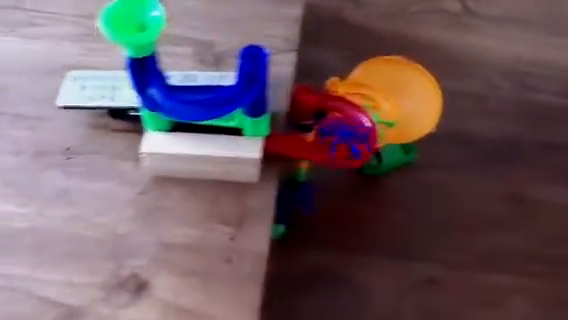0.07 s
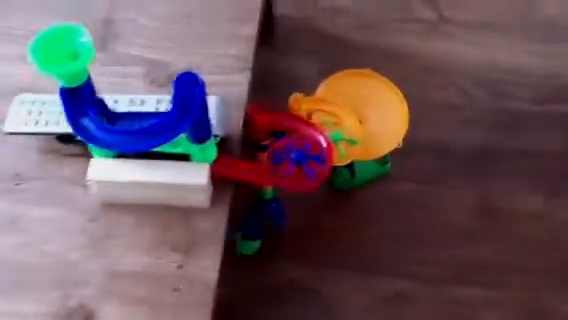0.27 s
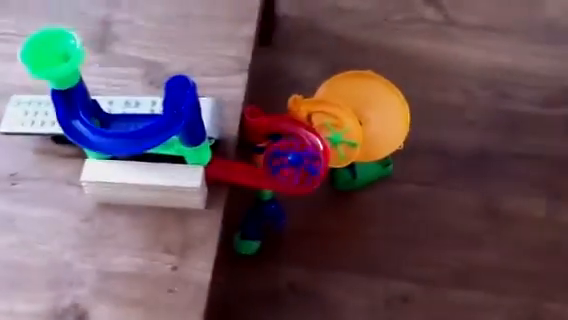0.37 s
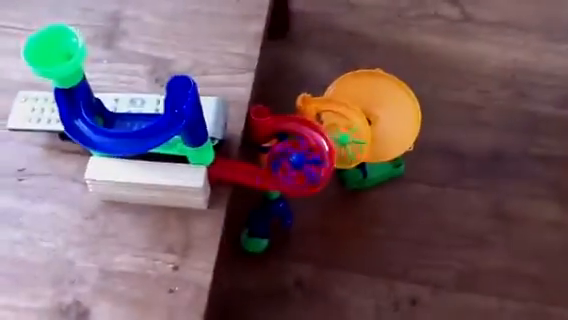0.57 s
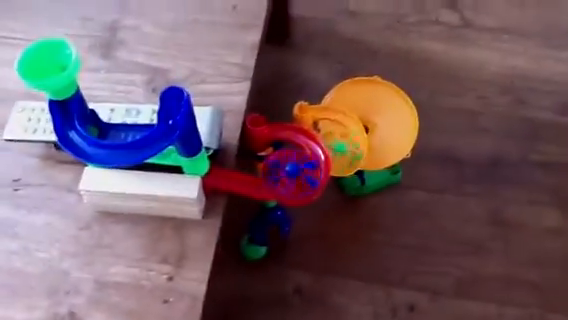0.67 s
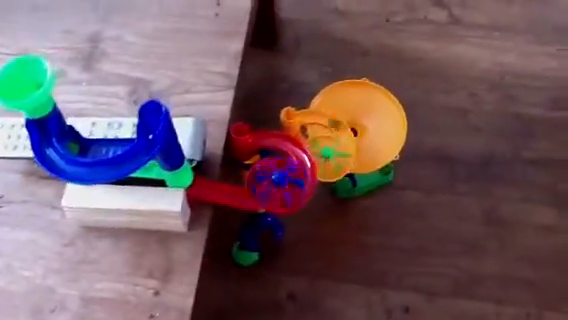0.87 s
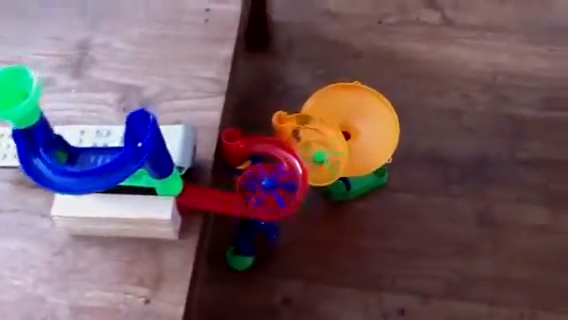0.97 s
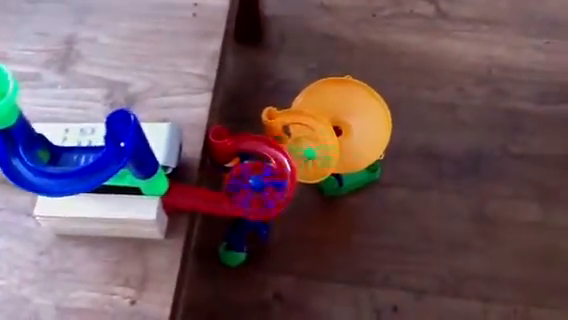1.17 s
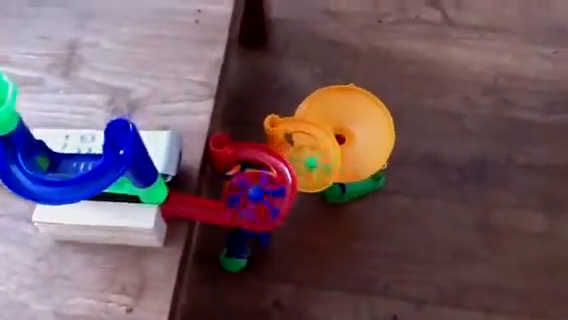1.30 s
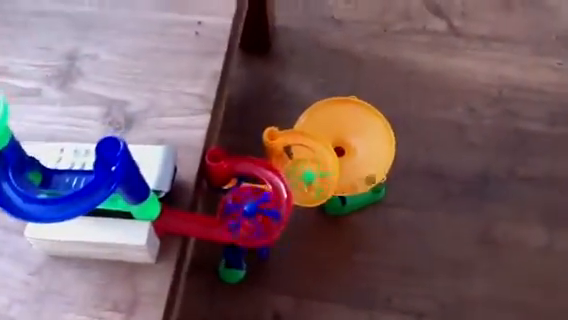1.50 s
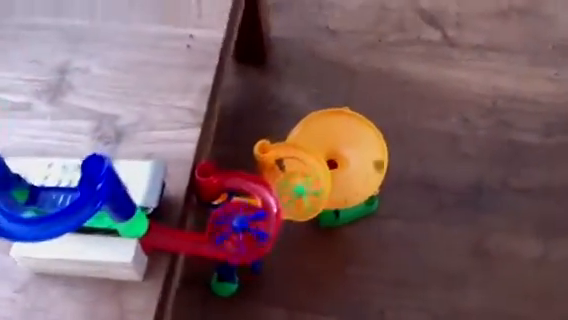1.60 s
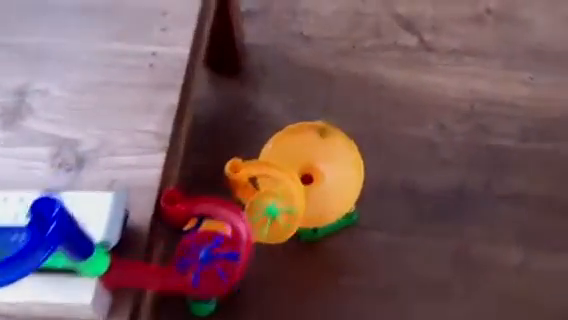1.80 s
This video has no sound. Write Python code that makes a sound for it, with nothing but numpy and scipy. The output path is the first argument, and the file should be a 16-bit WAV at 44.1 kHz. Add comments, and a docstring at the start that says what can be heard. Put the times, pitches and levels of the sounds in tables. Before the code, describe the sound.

A marble rolls along a plastic marble run with light ticks, then clatters sharply through a paddle wheel at about 0.2 to 0.3 seconds. From 0.5 seconds it rumbles thinly around a spiral with softer ticks. A second burst of hollow clacks comes around 1.2 seconds. From 1.5 seconds it circles a funnel with gentle knocks until about 1.8. The small room adds slight echo and faint hum.

```python
"""Light plastic ticks and a thin rumble: a marble sets off along the chute of a marble run in a small room.
It clatters through a paddle wheel, drops into a spiral track, knocks through a second wheel and circles
in a funnel. Knocks are single hits on walls and paddles; the rumble is a stream of tiny bumps.
Both make the hollow parts ring, each with its own modes, and the room answers over faint noise and hum."""
import sys
import numpy as np
from scipy import signal
from scipy.fft import rfft, irfft, next_fast_len
from scipy.io import wavfile

SR = 44100
rng = np.random.default_rng(int(sys.argv[2]) if len(sys.argv) > 2 else 0)


def store_pcm(level_fs):
    """Save levels as 16-bit WAV."""
    pcm = np.round(np.clip(level_fs, -1, 1) * 32767).astype(np.int16)
    wavfile.write(sys.argv[1], SR, np.atleast_2d(pcm).T)


N = 81585


def from_db(db):
    return 10 ** (np.asarray(db) / 20)


def unit_rms(x):
    return x / np.sqrt(np.mean(x ** 2) + 1e-20)


def unit_energy(x):
    return x / np.sqrt(np.sum(x ** 2))


def at_hz(curve, hz):
    """Read a curve on a log-frequency axis."""
    f, value = np.transpose(curve)
    return np.interp(np.log(np.maximum(hz, 1)), np.log(f), value)


def decay(t, t60):
    """Gain that falls by 60 dB in t60."""
    return np.exp(-np.log(1000) * t / t60)


def eq(x, *curves):
    """Minimum-phase equaliser from the sum of (f/Hz, level/dB) curves: nothing rings ahead of a hit."""
    size = 2 * next_fast_len(len(x) // 2 + SR // 20)
    hz = np.arange(size // 2 + 1) * SR / size
    gain = from_db(sum(at_hz(curve, hz) for curve in curves))
    cepstrum = irfft(np.log(gain))
    cepstrum[1:size // 2] *= 2
    cepstrum[size // 2 + 1:] = 0
    return irfft(rfft(x, size) * np.exp(rfft(cepstrum)), size)[:len(x)]


# colour of the room tone: f/Hz, relative level/dB
ROOM_TONE_EQ = [(30, -48), (70, -65), (150, 2), (300, 3.5), (800, -4.5), (2000, -17), (6000, -11),
                (15000, -15)]
# mains hum partials: f/Hz, RMS level/dB
HUM_PARTIALS = [(100, -79.5), (150, -74), (200, -67.5)]


def background(noise_db=-61.5):
    """A faint bed of room tone and mains hum."""
    t = np.arange(N) / SR
    hum = sum(np.sqrt(2) * from_db(db) * np.sin(2 * np.pi * (hz * t + rng.random()))
              for hz, db in HUM_PARTIALS)
    room_tone = unit_rms(eq(rng.standard_normal(N), ROOM_TONE_EQ))
    return from_db(noise_db) * room_tone + hum


# reverb time of the room: f/Hz, t60/s
REVERB_TIMES = [(200, 0.85), (1400, 0.55), (3700, 0.39), (10000, 0.48), (15000, 0.1)]


def room_reverb(x, build_s=0.0031):
    """Reflections gather into the diffuse tail of a small hard room; the treble dies first."""
    t = np.arange(SR * 3 // 4) / SR
    edges_hz = np.geomspace(60, 18000, 9)
    tail = 0
    for low, high in zip(edges_hz, edges_hz[1:]):
        bandpass = signal.butter(2, [low, high], "band", fs=SR, output="sos")
        band = signal.sosfilt(bandpass, rng.standard_normal(len(t)))
        tail += band * decay(t, at_hz(REVERB_TIMES, np.sqrt(low * high)))
    tail *= 1 - np.exp(-t / build_s)
    return signal.fftconvolve(x, unit_energy(tail))[:N]


# clear modes of each hollow part: f/Hz, level/dB against the shell's dense ring (before trim), t60/s
MODES = { "chute": [(433, -19, .35), (1156, -24, .25), (2208, -24, .12), (2480, -23, .1), (2637, -25, .3),
         (2920, -23, .2), (3305, -20, .13)], "wheel": [(433, -23, .35), (1421, -26, .25), (1720, -23, .2),
         (2100, -25, .3), (2311, -19, .2), (2915, -24, .28), (3294, -17, .15), (3444, -22, .45),
         (3478, -25, .55), (4677, -20, .33), (4745, -22, .22), (5180, -22, .19), (8550, -17, .18),
         (8668, -20, .2)], "spiral": [(470, -24, .2), (1386, -26, .25), (1640, -18, .3), (1715, -20, .3),
         (1762, -24, .25), (2100, -26, .2), (2374, -24, .2), (3947, -24, .15)],
         "lower wheel": [(1240, -22, .35), (1659, -19, .3), (1715, -25, .3), (1950, -27, .35),
         (2320, -22, .15), (2374, -22, .25), (2616, -20, .22), (2815, -20, .24), (3110, -21, .25),
         (3445, -21, .25), (3741, -26, .3), (5184, -24, .25)], "funnel": [(1032, -27, .25),
         (1240, -26, .25), (1335, -24, .25), (1437, -21, .3), (1629, -23, .25), (1708, -24, .25),
         (1950, -26, .25), (2601, -24, .25), (2829, -25, .25)]}
# voicing of each part: trim level/dB of its modes, top shelf level/dB of its knocks
VOICING = {"chute": (-2.2, -14.5), "wheel": (-3.5, -8.5), "spiral": (-1, 0), "lower wheel": (-6.5, -2.5),
           "funnel": (-0.5, 0)}


def mode_ring(part, length_s=.35, spread_db=2.5, detune=0.0017, max_cycles=1500):
    """A part's modes, varying in level and pitch from spot to spot; plastic damps the high ones quickly."""
    t = np.arange(int(length_s * SR)) / SR
    trim_db, _ = VOICING[part]
    ring = 0
    for k, (hz, db, t60) in enumerate(MODES[part]):
        level_draw, pitch_draw = rng.uniform(-1, 1, 2) * np.sqrt(3)   # unit variance
        wave = (-1) ** k * np.sin(2 * np.pi * hz * (1 + detune * pitch_draw) * t)
        gain = from_db(db + trim_db + spread_db * level_draw)
        ring += gain * wave * decay(t, min(t60, max_cycles / hz))
    return ring


def tap(modes, shell_t60_s=.075, crack_t60_s=0.0037, crack_db=-0.5):
    """One contact: a crack while marble and wall touch, the shell's dense short ring and the modes."""
    t = np.arange(len(modes)) / SR
    envelope = decay(t, shell_t60_s) + from_db(crack_db) * decay(t, crack_t60_s)
    shell = rng.standard_normal(len(modes)) * envelope
    return (shell + modes) / np.sqrt(np.sum(envelope ** 2))


# how hard the marble rolls on each part: t/s, level/dB
ROLL_FADERS = { "chute": [(0, -37), (.1, -45), (.2, -41), (.23, -72)], "spiral": [(.44, -50), (.49, -47),
               (.53, -47.5), (.57, -43), (.68, -38.5), (.78, -49.5), (.85, -47.5), (.94, -48.5),
               (.99, -40.5), (1.04, -43), (1.08, -47.5), (1.14, -40.5)], "lower wheel": [(1.14, -59),
               (1.27, -35), (1.33, -44), (1.41, -42.5), (1.46, -43), (1.52, -46.5)], "funnel": [(1.5, -39),
               (1.54, -39.5), (1.62, -43), (1.7, -41.5), (1.77, -41), (1.85, -50)]}
# colour of the rolling contact on each part: f/Hz, relative level/dB
ROLL_EQ = { "chute": [(100, -24), (250, -7), (450, -1), (850, -6.5), (1600, 0), (2700, 1), (5000, -10.5),
           (9000, -19), (15000, -24)], "spiral": [(100, -27), (280, -3.5), (500, -2.5), (900, -4.5),
           (1650, 2.5), (2700, -5), (5000, -17.5), (9000, -22), (15000, -36)], "lower wheel": [(100, -42),
           (280, -6), (500, -10.5), (950, -6.5), (1800, 3.5), (2700, -6), (5000, -14), (9000, -23.5),
           (15000, -28)], "funnel": [(100, -31.5), (280, -5.5), (500, -9), (900, -6.5), (1500, 3),
           (2700, -9), (5000, -19.5), (9000, -28.5), (15000, -37)]}


def rolling(bumps_per_s=2500, spread_db=4.5, spot_count=4, modes_db=-6):
    """Tiny random bumps, dealt among a few spots, shake each part, stirring its modes less than a knock."""
    t = np.arange(N) / SR
    out = np.zeros(N)
    for part, fader in ROLL_FADERS.items():
        bumps = (rng.random(N) < bumps_per_s / SR) * rng.choice([-1, 1], N)
        sizes = from_db(spread_db * np.minimum(rng.exponential(1, N), 4))
        times, levels_db = np.transpose(fader)
        gain = from_db(np.interp(t, times, levels_db, left=-np.inf, right=-np.inf))
        force = unit_rms(bumps * sizes) * gain
        spots = rng.integers(0, spot_count, N)
        for spot in range(spot_count):
            modes = from_db(modes_db) * mode_ring(part)
            body = unit_energy(eq(tap(modes), ROLL_EQ[part]))
            out += signal.fftconvolve(force * (spots == spot), body)[:N]
    return out


def spot_colour(peak_hz, peak_db=10.5, ripple_db=3.5, ripple_step_hz=646):
    """Two EQ curves for a struck spot: random peaks and dips growing with frequency, and its resonance."""
    ripple_hz = 2500 + ripple_step_hz * np.arange(22)
    depth_db = ripple_db * np.sqrt(np.linspace(0, 1, len(ripple_hz)))
    ripple = depth_db * rng.uniform(-1.17, 1, len(ripple_hz)) * np.sqrt(3)
    hz = np.geomspace(100, 20000, 400)
    half_width_hz = 90 + 0.029 * peak_hz
    resonance = peak_db / (1 + ((hz - peak_hz) / half_width_hz) ** 2)
    return np.c_[ripple_hz, ripple], np.c_[hz, resonance]


# how well the thin shell radiates a knock: f/Hz, level/dB
SHELL_EQ = [(50, -46), (110, -30), (200, -15.5), (310, -4), (480, -4), (750, -7.5), (1000, -7.5),
            (1400, -2), (2300, 1.5), (4000, -0.5), (9000, -1.5), (15000, 3.5)]
# the five EQ points of a hit, low to high: f/Hz
HIT_EQ_HZ = [400, 1600, 3000, 6500, 12000]
# cue list of the marble's hits: t/s, level/dB at each of the five EQ points, attack/s, spot's f/Hz, part
HITS = [ (.004, -11, -27, -17, -15, -44, 0.0015, 2750, "chute"),
        (.022, -19, -23, -10, -24, -35, 0.0017, 2930, "chute"),
        (0.0704, -10, -16, -11, -13, -21.5, 0.00017, 4500, "chute"),
        (0.132, -28, -13, -8.5, -12, -23, 0.0026, 2600, "chute"),
        (0.17, -21, -3, -3.5, -14.5, -20, 0.0023, 2500, "chute"),
        (0.2114, 8, 7.5, 10.5, 13.5, 8, 0.00011, 3330, "chute"),
        (0.2511, 7, 6.5, 9.5, 0, -4, 0.0011, 14700, "wheel"),
        (.278, 2.5, 10, 5, 7, -1, 0.00063, 10800, "wheel"),
        (.287, 7, 3, 6.5, -47, -2, .002, 11000, "wheel"),
        (.2945, -7, 10.5, -4, 7, -22, 0.0014, 1760, "wheel"),
        (0.3092, -2, 5, 14, 11, 10.5, 0.00006, 4890, "wheel"),
        (0.3143, 10, 15, 12, 12, 5.5, 0.00023, 10700, "wheel"),
        (0.5476, -3, -3.5, -5, -13, -27, 0.0023, 2700, "spiral"),
        (.562, -0.5, -7, 4, -5, -2.5, 0.00025, 10700, "spiral"),
        (0.5906, -9, 5.5, 0, -4, -8, 0.00032, 13400, "spiral"),
        (0.612, -20, -13, -1, -5, -3, 0.00044, 8500, "spiral"),
        (.621, -9, 4.5, 2, -17, -18, 0.0014, 14300, "spiral"),
        (.632, 1, -11, -1, -2, -11, 0.0035, 8200, "spiral"),
        (0.656, 3.5, 0, -0.5, -7.5, -10, 0.0011, 5070, "spiral"),
        (.668, -6, -4, -5, -8, -14, 0.0033, 2020, "spiral"),
        (0.708, -7, -12, -7, -8.5, -13, 0.00049, 3880, "spiral"),
        (.731, -14, -10.5, -19, -17, -39, 0.003, 1690, "spiral"),
        (0.877, -1, -9, -12, -19, -40, 0.0012, 3070, "spiral"),
        (.960, -10, -2, -15, -16, -31, .002, 9200, "spiral"),
        (.980, -5, 0.5, -7, -21, -28, 0.0013, 1585, "spiral"),
        (.994, -0.5, -27, -1.5, -15, -30, .003, 2400, "spiral"),
        (1.0905, -7, -4.5, 1, -9.5, -24.5, .0005, 2360, "spiral"),
        (1.1445, -8, 9.5, 7.5, 2, 0.5, 0.00014, 2540, "lower wheel"),
        (1.149, 6.5, 15, 7, 2, -20, 0.00033, 2890, "lower wheel"),
        (1.165, 7.5, 10, -5, 4, -6, 0.0029, 1665, "lower wheel"),
        (1.1822, 10, 11, 9, 6, -2.5, 0.00022, 3860, "lower wheel"),
        (1.205, 9.5, 12.5, 13, 3.5, -3, 0.00061, 10400, "lower wheel"),
        (1.210, -10, 13.5, -2, 2, -7.5, 0.00067, 3000, "lower wheel"),
        (1.223, -2, 4, -2, -2, -34, 0.0012, 1740, "lower wheel"),
        (1.261, -3, -10, -1, -29, -54, 0.0024, 1830, "lower wheel"),
        (1.382, -11, 0, -6, -12, -26, 0.0013, 1800, "lower wheel"),
        (1.5152, -1, -10, -4.5, -15, -33, 0.0033, 1950, "funnel"),
        (1.531, -10, -4.5, -8.5, -21, -36, .003, 2580, "funnel"),
        (1.561, 0, -7, -11, -23, -34, 0.0045, 1484, "funnel"),
        (1.743, -18, -14, -10, -29, -50, 0.0052, 1450, "funnel"),
        (1.757, -17, -7, -6, -22.5, -24.5, 0.0015, 6200, "funnel")]


def knocks(shelf_from_hz=11500, shelf_full_hz=13500):
    """The marble hits walls and paddles. Sharp knocks start at once;
    those hidden inside the toy, heard mostly by reflection, swell."""
    out = np.zeros(N)
    for onset_s, *levels_db, attack_s, spot_hz, part in HITS:
        start = int(onset_s * SR)
        sharp_hit = tap(mode_ring(part))
        t = np.arange(1, len(sharp_hit) + 1) / SR
        hit = sharp_hit * (1 - np.exp(-t / attack_s))
        hit *= np.std(sharp_hit) / np.std(hit)   # a soft attack keeps the same energy
        _, shelf_db = VOICING[part]
        shelf = [(shelf_from_hz, 0), (shelf_full_hz, shelf_db)]
        strength = list(zip(HIT_EQ_HZ, levels_db))
        hit = eq(hit, strength, shelf, *spot_colour(spot_hz))[:N - start]
        out[start:start + len(hit)] += hit
    return eq(out, SHELL_EQ)


def scene(reverb_db=-6.5):
    """The marble run, its reverb and the background, in mono."""
    marble_run = knocks() + rolling()
    mix = marble_run + from_db(reverb_db) * room_reverb(marble_run) + background()
    return mix[None]


def record(dry, cutoff_hz=15150):
    """A steep low-pass takes off the very top."""
    lowpass = signal.ellip(10, .3, 80, cutoff_hz, fs=SR, output="sos")
    return signal.sosfilt(lowpass, dry)


dry = scene()
out = record(dry)
store_pcm(out)
```